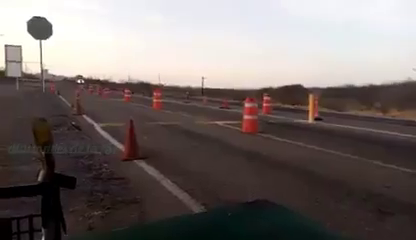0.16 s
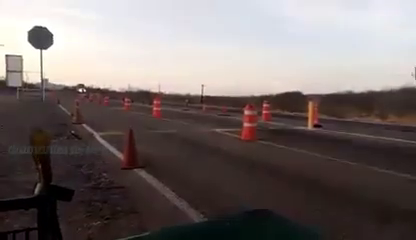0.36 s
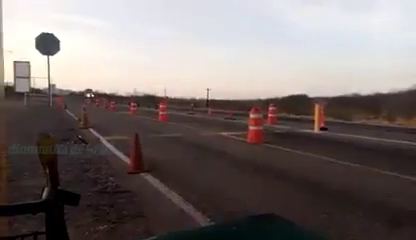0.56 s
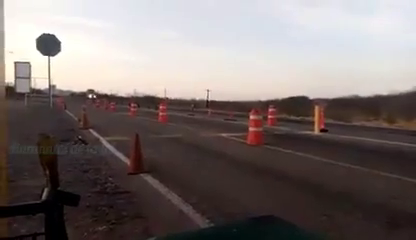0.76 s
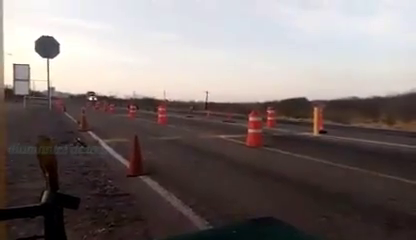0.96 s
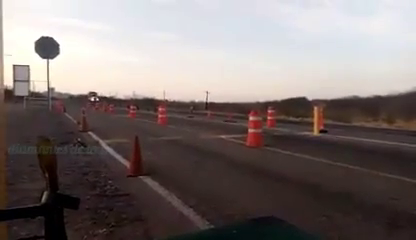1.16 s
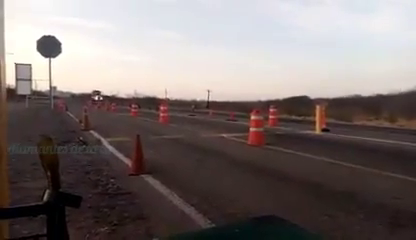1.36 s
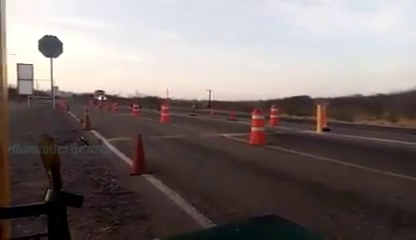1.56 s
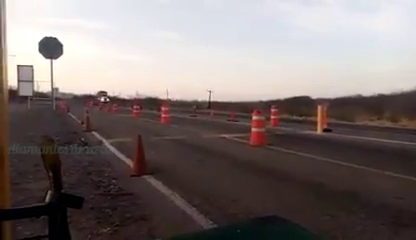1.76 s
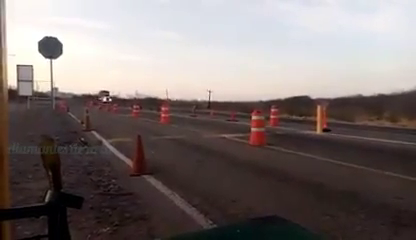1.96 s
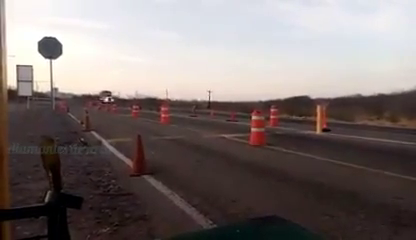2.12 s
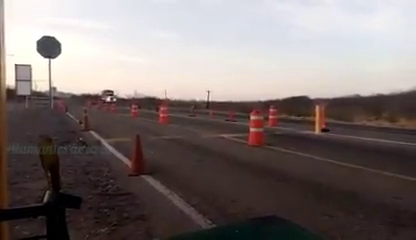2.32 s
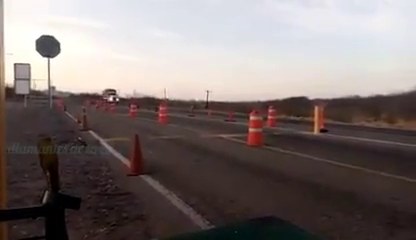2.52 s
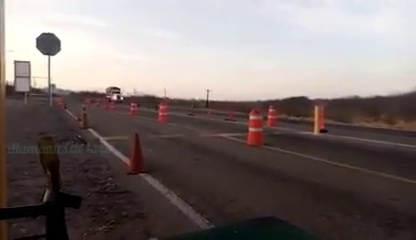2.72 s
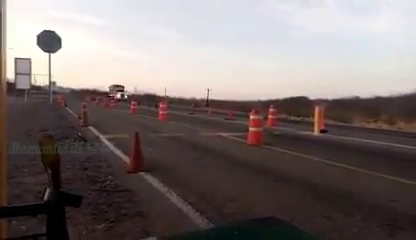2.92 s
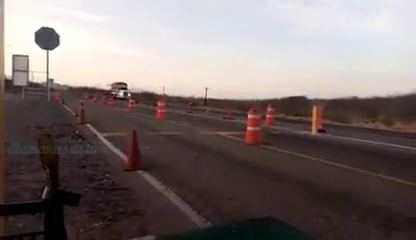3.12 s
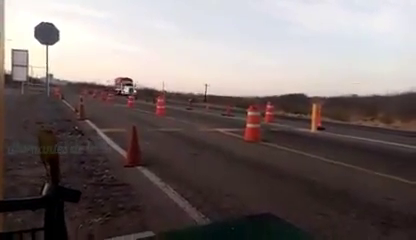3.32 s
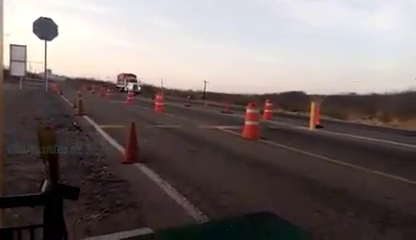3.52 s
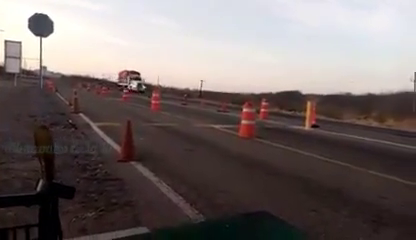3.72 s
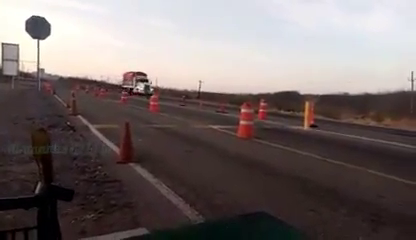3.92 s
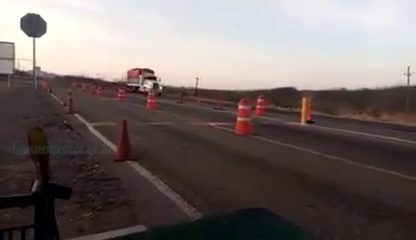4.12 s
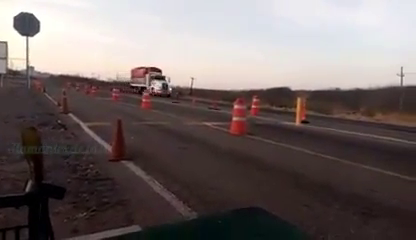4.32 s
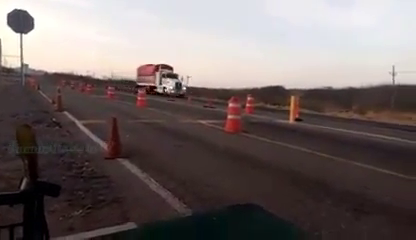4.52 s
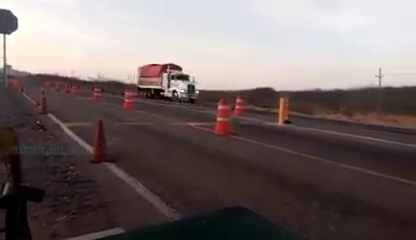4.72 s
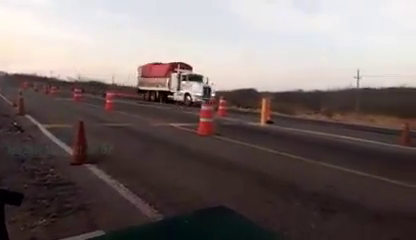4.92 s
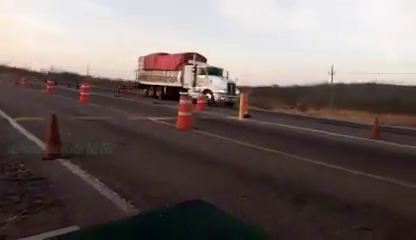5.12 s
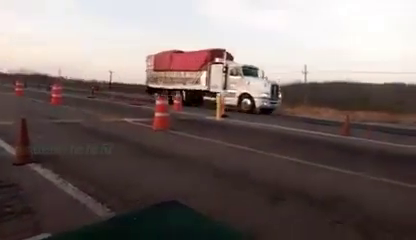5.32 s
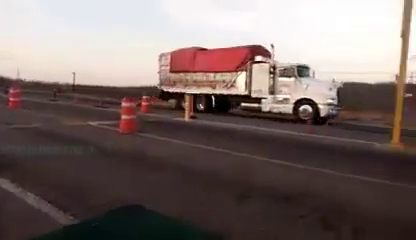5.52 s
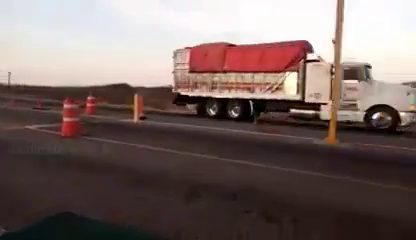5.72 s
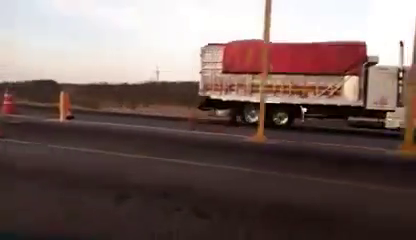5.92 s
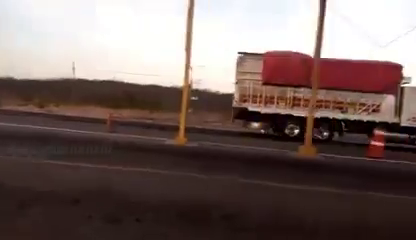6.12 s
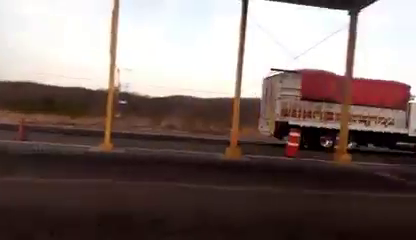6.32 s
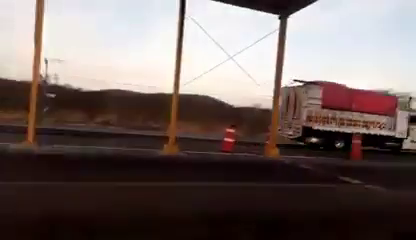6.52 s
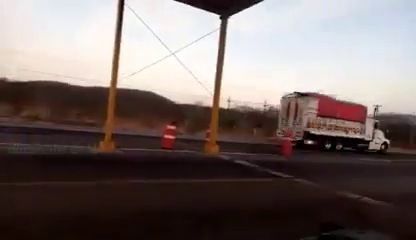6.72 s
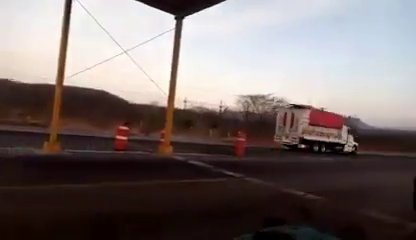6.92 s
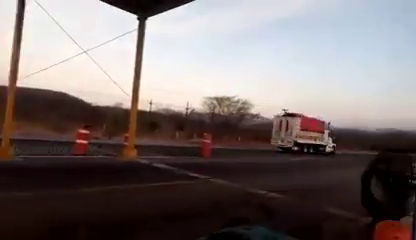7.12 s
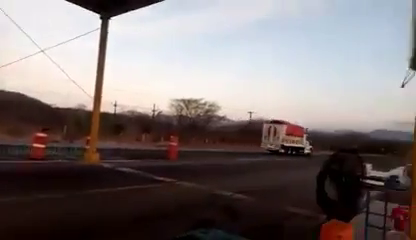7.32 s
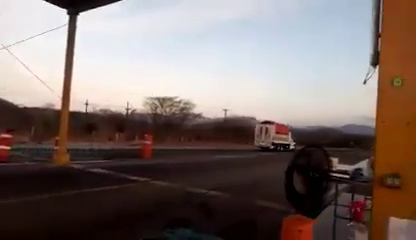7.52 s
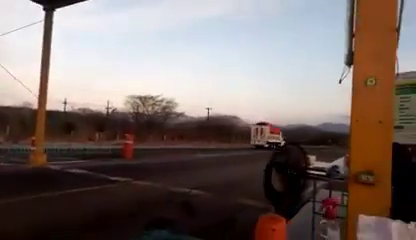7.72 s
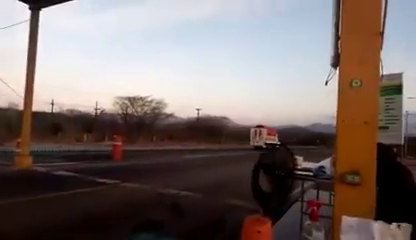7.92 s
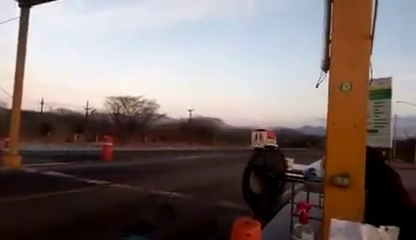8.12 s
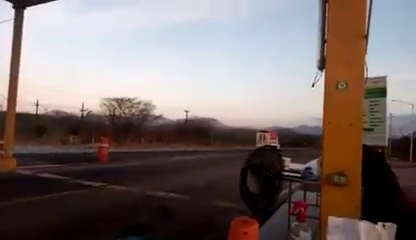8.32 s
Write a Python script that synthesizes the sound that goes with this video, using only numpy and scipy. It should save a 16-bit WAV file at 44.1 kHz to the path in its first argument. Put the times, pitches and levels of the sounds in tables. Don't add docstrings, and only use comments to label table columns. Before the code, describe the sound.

Out of brief silence, a distant diesel truck's engine brake sputters in a low, rapid throb. It cuts out for a gear change, leaving a soft rumble and faint falling turbo whistle, stutters back, then grows into a harsh hammering bark. It passes close with tyre roar and hiss, drops in pitch and recedes. A small phone microphone under a tin canopy catches short metallic echoes and strains at the peak.

```python
import sys
import numpy as np
from scipy import signal
from scipy.fft import rfft, irfft, next_fast_len
from scipy.io import wavfile
from scipy.ndimage import uniform_filter1d, minimum_filter1d

SR = 44100
rng = np.random.default_rng(int(sys.argv[2]) if len(sys.argv) > 2 else 0)


def to_wav(sig):
    pcm = np.clip(np.atleast_2d(sig), -1, 1) * 32767
    pcm = np.round(pcm).astype(np.int16)
    wavfile.write(sys.argv[1], SR, pcm.T)


def gain_from_db(level_db):
    decades = np.asarray(level_db, float) / 20
    return 10 ** decades


N = 373086
TIME = np.arange(N) / SR

SPEED_M_S, KERB_M, PASSES_S, SOUND_M_S = 27.6451, 15.4529, 6.0406, 343
SENT = np.linspace(-8, 4, 4801)
STACK_M, MIC_M, CLIMB_PER_M, CLIMB_M = 3.5, 1.45, .0045, 60
BRAKE_OFF_S, VALVE_S = (2.2, 3.58), 0.068

# (first [cycle], last [cycle], count at the pass [cycle], rate [cycle/s], gain of rate [cycle/s^2])
BRAKE_RUNS = [
    (2.3, 33.7, 94.2228, 14.76039, .059816),
    (56.3, 129, 94.2033, 14.6563, 0),
]
# (place in cycle [0-1], shock [dB], boom [dB], crackle [dB], rise [ms])
CYLINDERS_FAR = [(0, 5.5, 5.5, 2, 0.087), (.16, -5.5, -14, -39, 0.18), (.27, -19, -31, -15, 0.57),
                 (.509, 5, 3.5, -12, 0.28), (.70, -6, -25, -4, 0.36), (.94, -13, -29, -18, .6)]
# (place in cycle [0-1], shock [dB], boom [dB], crackle [dB], rise [ms])
CYLINDERS_FRONT = [(0, 4, -2.5, -2.5, 0.33), (.16, -37.5, -6, -16, 0.2), (.28, -30, -8.5, -36, 1),
                   (.508, 6.5, -1.5, -6.5, 0.42), (.70, -29, -22, -23.5, 0.42),
                   (.78, -13, -18.5, -40, 0.77)]
# (place in cycle
# [0-1], shock [dB], boom [dB], crackle [dB], rise [ms])
CYLINDERS_REAR = [(0, 12, 1, 1, 0.04), (.17, -10, -16, -7.5, 0.2), (.329, 8, 4, -4, 0.04),
                  (.51, 7, 1, -12.5, 0.4), (.662, 8.5, -10.5, -9.5, .04), (.85, -6.5, -18, -33, 0.3)]
# (place in cycle [0-1], shock [dB], boom [dB], crackle [dB], rise [ms])
CYLINDERS_SIDE = [(0, 8.5, 1.5, -0.5, 0.04), (.17, 1, -5, -8.5, 0.2), (.329, 8, -0.5, -3, 0.066),
                  (.51, -2.5, -7.5, -11, 0.2), (.662, 8.5, -2, -1, .04), (.85, -3.5, -5.5, -22.5, 0.2)]
# (frequency [Hz], t60 [s], level [dB])
PIPE_FAR = [(130, 0.12, -3), (178, 0.12, 1), (206.7, 0.077, -8.5), (315.7, 0.12, -14), (407, 0.07, -10.5),
            (635, 0.12, -10), (1043, 0.21, -29.5), (1595, 0.029, -24)]
# (frequency [Hz], t60 [s], level [dB])
PIPE_FRONT = [(132, 0.19, -9), (184, 0.073, -6.5), (213, 0.12, -9), (250, 0.17, -15.5), (319.7, 0.15, -7.5),
              (421, 0.058, -5.5), (533.4, 0.15, -0.5), (637.3, 0.1, -4.5), (1164, 0.08, -7.5)]
# (frequency [Hz], t60 [s], level [dB])
PIPE_REAR = [(113, 0.039, -27), (154, 0.072, 0), (208.3, 0.11, -5), (246.3, 0.072, -5.5), (448, 0.017, -1),
             (543.6, 0.031, -3.5), (588, 0.11, -13)]
# (frequency [Hz], t60 [s], level [dB])
PIPE_ABREAST = [(164.4, 0.13, 2.5), (226, 0.15, 4), (310, 0.071, -11), (389, 0.17, -0.5), (437, 0.058, -4),
                (580, .07, -1.5), (693, 0.091, 0), (820, 0.061, 9)]
# (frequency [Hz], t60 [s], level [dB])
BARKING_TIP = [(897, 0.0077, -9.5), (1380, 0.0071, -8)]
# (delay [ms], shock [dB], crackle [dB])
STACK_REPEATS = [
    (0, 0, 0),
    (6.5, -13, -5),
    (9.6, -8, -11),
]
# (time [s], distant [0-1], oncoming [0-1], leaving [0-1], abreast [0-1])
STACK_FACING = [
    (3, 1, 0, 0, 0),
    (3.1, 0, 1, 0, 0),
    (5.72, 0, 1, 0, 0),
    (5.92, 0, 0, 0, 1),
    (6.3, 0, 0, 0, 1),
    (6.6, 0, 0, 1, 0),
]
# (at distance [m], blast [dB], crackle [dB], boom [dB], bark [dB])
SIDE_LEVELS = [
    (125.7, -26, -14.5, 4, -4.1),
    (37.1, -15.5, -10, 1.5, 3),
    (36, -21.5, -0.5, 5, -10.5),
    (17.3, -18, -1.5, 0.7, -13.5),
]
# (blast [dB], crackle [dB], boom [dB], bark [dB])
SIDE_SLOPES = [
    (-5.5, -18, -3.2, 4.5),
    (-5, -0.5, 3, -1),
    (-3, -0.3, 1.5, 1.5),
    (-4.5, -1, 3.1, 1),
]
SIDE_REPEATS_DB = [1, -0.5, -5, -4]
SIDE_SHOCK_MS = [.38, .3, .11, .15]
SIDE_PITCH = [-1, -1, 1, 0]
# (time [s], peak [dB])
UNEVEN_BLASTS = [(4.988, -3), (5.052, -1), (5.115, -2), (5.147, -3), (5.178, -3), (5.211, -3), (5.242, -3),
                 (5.274, -2), (5.306, -2), (5.37, 0), (5.402, -4), (5.434, 0), (5.466, -4), (5.498, -3),
                 (5.53, 0), (5.562, -3), (5.596, -2), (5.627, -1), (5.693, 3), (5.725, -3), (5.758, -1),
                 (5.824, 0), (5.891, 0), (5.912, -1), (5.934, 0), (5.958, -1), (6.025, 1), (6.094, 0),
                 (6.162, 0), (6.232, 1), (6.303, 1), (6.373, 0), (6.445, 0), (6.492, 1), (6.517, 1),
                 (6.588, 1), (6.661, 1), (6.733, 2), (6.805, 0), (6.853, -1), (6.95, -2), (7.023, 0),
                 (7.169, 0), (7.242, -1), (7.315, -2)]
# (time [s], peak [dB], rise [ms])
VALVE_STUTTER = [(2.4717, -28, 0.23), (2.479, -13.5, 0.073), (2.502, -9.5, 0.47), (2.5122, -16.5, 0.087),
                 (2.5341, -11, 0.076), (2.725, -16.5, 0.17), (2.7312, -16, 0.076), (2.753, -10, 0.22),
                 (2.764, -14.5, 0.71), (2.7867, -8, 0.052), (3.5495, -10.5, 0.11), (3.569, -9.5, 0.65),
                 (3.583, -6.5, 0.17), (3.6054, -4, 0.1), (3.642, -26, 0.14), (3.675, -9, 0.15)]
# (nearest [dB], oncoming [dB/doubling], leaving [dB/doubling], brake released [dB])
ROLLING_LEVELS = [
    (-16.5, -5, -9, -0.5),
    (-20, -7, -3.5, -8.5),
]
# (frequency [Hz], density [dB])
ROAR_COLOUR = [(15, -59), (25, -38.5), (59, 0), (91, 0), (147, -7), (189, 2), (262, -6.5), (283, -12),
               (850, -13.5), (2500, -34), (3250, -57), (5500, -120)]
# (frequency [Hz], density [dB])
HISS_COLOUR = [(500, -38), (1200, 9.5), (2500, 6.5), (4200, 2), (6400, -11), (8000, -12.5), (12000, -26.5)]
# (time [s], pitch [Hz], level [dB])
TURBO_GLIDE = [
    (2.85, 9900, -80),
    (2.92, 9550, -50),
    (3.2, 8800, -50),
    (3.45, 8300, -52),
    (3.56, 8200, -80),
]
# (time [s], pipe bass [dB], canopy echo [dB])
SHELTER_LEVELS = [(0, 1.7, -5.5), (2.2, -0.4, -1), (3.6, 1, 0), (4.4, -0.4, 0), (5.0, 0.8, -0.5),
                  (5.4, -1.5, -7), (5.6, -5.5, -8), (5.85, -10, -5.5), (6.05, -1.5, -0.7), (6.35, 3.5, 3.8),
                  (6.8, -1, -1.5), (7.3, -0.8, -3.5), (7.9, 0, -2), (8.46, -0.8, -2)]
# (frequency [Hz], level [dB])
TIN_COLOUR = [(150, -7), (400, 2), (1000, -2)]
# (frequency [Hz], level [dB])
MIC_COLOUR = [(20, -20), (60, -17), (120, -3.5), (300, 0), (2500, -5), (4500, -6.5), (6500, -0.5),
              (8000, -15), (9300, -20.5), (10500, -23.5), (16000, -26.5)]

BLOCK, BLOCK_START = 1024, 170


def curves(table, at=TIME):
    s, *columns = np.transpose(table)
    return [np.interp(at, s, c) for c in columns]


def colour(x, spectrum):
    hz, db = np.transpose(spectrum)
    size = next_fast_len(len(x))
    bins_hz = np.fft.rfftfreq(size, 1 / SR)
    gain = gain_from_db(np.interp(np.log(bins_hz + 1), np.log(hz), db))
    return irfft(rfft(x, size) * gain, size)[:len(x)]


def noise(spectrum, flicker_db, flicker_hz):
    k = int(SR / flicker_hz)
    walk = uniform_filter1d(np.repeat(rng.standard_normal(N // k + 1), k), k)[:N]
    x = colour(rng.standard_normal(N), spectrum) * gain_from_db(flicker_db * walk)
    return x / x.std()


def strike(times, gains, shape, pitch=None):
    out, steps = np.zeros(N + len(shape)), np.arange(len(shape))
    for k, (start, gain) in enumerate(zip((times * SR).astype(int), gains)):
        if 0 <= start < N and gain > 1e-7:
            copy = shape if pitch is None else np.interp(steps * pitch[k], steps, shape)
            out[start:start + len(shape)] += gain * copy
    return out[:N]


def heard(sent):
    return PASSES_S + sent + (np.hypot(SPEED_M_S * sent, KERB_M) - KERB_M) / SOUND_M_S


def truck(at=TIME):
    along = SPEED_M_S * np.interp(at, heard(SENT), SENT)
    return along, np.hypot(along, KERB_M)


def doppler(times, side):
    along, metres = truck(times)
    return (SOUND_M_S + side * SPEED_M_S) / (SOUND_M_S + SPEED_M_S * along / metres)


def released():
    off, on = BRAKE_OFF_S
    return np.clip(np.minimum(TIME - off, on - TIME) / VALVE_S + .5, 0, 1)


def arrivals(turns):
    times = np.full(len(turns), 99.)
    for first, last, at_pass, rate, gain in BRAKE_RUNS:
        sent = np.interp(turns, at_pass + rate * SENT + gain * SENT ** 2 / 2, SENT)
        times = np.where((turns > first) & (turns < last), heard(sent), times)
    return times


def accent_db(times):
    s, db = np.transpose(UNEVEN_BLASTS)
    usual_db, share = -1.5, 1.1
    return (np.abs(times[:, None] - s) < .004) @ (share * (db - usual_db))


def ring(modes):
    t = TIME[:SR // 6]
    return sum(gain_from_db(db) * np.cos(2 * np.pi * hz * t) * np.exp(-np.log(1000) * t / t60)
               for hz, t60, db in modes)


def blasts(times, shock_db, boom_db, crackle_db, bark_db, rise_ms, modes,
           again_db=0, lead_s=0, shock_ms=0.29, side=-1):
    t = TIME[:SR // 50] * 1000
    front = np.exp(-t / rise_ms)
    front /= front.sum()
    push = 1.4 * np.exp(-t / shock_ms)
    suction = 1.4 * shock_ms * np.exp(-t / 1.2)
    shock = np.convolve(push - suction, front)
    bark = np.convolve(ring(BARKING_TIP)[:len(t)], front)
    gas = (1 - np.exp(-(t / 1.0) ** 2)) * (1.61 * np.exp(-t / 1.5) + 0.12 * np.exp(-t / 7))
    boom = ring(modes)
    boom = boom * (1 - np.exp(-TIME[:len(boom)] / 0.00059))
    out = strike(times - lead_s, gain_from_db(boom_db - 11.5), boom, doppler(times, side))
    gate = 0
    for ms, echo_db, hiss_db in STACK_REPEATS:
        echo_db, hiss_db = np.array([echo_db, hiss_db]) + again_db * (ms > 0)
        late = times + ms / 1000
        out += strike(late, gain_from_db(shock_db + echo_db), shock)
        out += strike(late, gain_from_db(shock_db + hiss_db + bark_db), bark)
        gate += strike(late, gain_from_db(crackle_db + hiss_db), gas)
    return out, gate


def braking_cylinder(cylinder, modes, stage):
    place, shock_db, boom_db, crackle_db, rise_ms = cylinder
    cycles = np.arange(130.)
    chance = rng.standard_normal((len(cycles), 4)).T
    times = arrivals(cycles + place)
    even = round(place * 6) / 6
    lead_s = (times - arrivals(cycles + even)) * (abs(place - even) < .02 and stage < 2)
    metres = truck(times)[1]
    near = KERB_M / metres
    scatter_db = .1 + 1.0 * near
    jitter_ms = .02 + .15 * near ** 3
    times = times + jitter_ms * chance[0] / 1000 * min(place * 20, 1)
    facing_db = 20 * np.log10(curves(STACK_FACING, times)[stage] + 1e-9)
    at_m, *levels_db = SIDE_LEVELS[stage]
    change_db = np.outer(SIDE_SLOPES[stage], np.log2(metres / at_m))
    blast_db, hiss_db, low_db, bark_db = np.array(levels_db)[:, None] + change_db
    db = blast_db + facing_db + 17.0 + scatter_db * chance[1] + accent_db(times)
    return blasts(times, db + shock_db,
                  db - 3.5 + boom_db + low_db + scatter_db * chance[3],
                  db + crackle_db + hiss_db + 5 + scatter_db * chance[2],
                  bark_db, max(rise_ms, .02), modes, SIDE_REPEATS_DB[stage], lead_s,
                  SIDE_SHOCK_MS[stage], SIDE_PITCH[stage])


def engine_brake():
    out, gate = 0, 0
    sides = ((CYLINDERS_FAR, PIPE_FAR), (CYLINDERS_FRONT, PIPE_FRONT),
             (CYLINDERS_REAR, PIPE_REAR), (CYLINDERS_SIDE, PIPE_ABREAST))
    for stage, (cylinders, modes) in enumerate(sides):
        for cylinder in cylinders:
            sound, puff = braking_cylinder(cylinder, modes, stage)
            out, gate = out + sound, gate + puff
    sound, puff = valve_stutter()
    torn_gas = noise([(300, 0.0), (1200, 9.0), (3200, 3.0), (4300, 0.5), (16000, -3.5)], 2.26, 2000)
    return out + sound + (gate + puff) * torn_gas


def rolling():
    along, metres = truck()
    doublings = np.log2(metres / KERB_M)
    roar_db, hiss_db = (db + np.where(along < 0, coming, going) * doublings + off_db * released()
                        for db, coming, going, off_db in ROLLING_LEVELS)
    return gain_from_db(roar_db) * noise(ROAR_COLOUR, 2.2, 25) + gain_from_db(hiss_db) * noise(HISS_COLOUR, 1.0, 40)


def road_bounce(x):
    along, metres = truck()
    stack = STACK_M * (1 + CLIMB_PER_M * np.clip(along, -CLIMB_M, CLIMB_M))
    late = (np.hypot(metres, stack + MIC_M) - np.hypot(metres, stack - MIC_M)) / SOUND_M_S
    dull = colour(x, [(1500, -1.5), (3500, -3.5), (7000, -11.5)])
    return x + np.exp(-metres / 230) * np.interp(TIME - late, TIME, dull)


def canopy(x):
    place = 21 * (np.arctan(truck()[0] / KERB_M) / np.pi + .5)
    t = TIME[:SR // 3]
    tail = np.exp(-np.log(1000) * t / 0.39) * np.minimum(t / 0.0025, 1)
    out = 0
    for k in range(23):
        echoes = rng.standard_normal(len(t)) * tail
        share = np.cos(np.clip(place - k, -1, 1) * np.pi / 2)
        out += signal.fftconvolve(x * share * gain_from_db(-1), echoes / np.linalg.norm(echoes))[:N]
    return colour(out, TIN_COLOUR)


def rumble():
    throb = noise([(40, -36.0), (70, -16.5), (95, 0.0), (125, -0.5), (250, -36.5)], 0.82, 27)
    return gain_from_db(-31) * released() * throb


def valve_stutter():
    out, gate = 0, 0
    crackle_db, bark_db = -14, -6
    one = np.ones(1)
    for time, db, rise_ms in VALVE_STUTTER:
        sound, puff = blasts(time * one, (db + 7.5) * one, (db + 0.5) * one,
                             (db + crackle_db + 3.5) * one, bark_db, max(rise_ms, .02), PIPE_FAR)
        out, gate = out + sound, gate + puff
    return out, gate


def turbo_whistle():
    hz, db = curves(TURBO_GLIDE)
    waver = 1 + .01 * noise([(1, -7.5), (40, -3), (200, -49)], 0, 5)
    return gain_from_db(db) * np.sin(2 * np.pi * np.cumsum(hz * waver) / SR)


def hand(x):
    late_s, share = 0.372 / 1000, 0.16
    turned = sum(curves(STACK_FACING)[2:])
    return x + share * turned * np.interp(TIME - late_s, TIME, x)


def post(x):
    notched = colour(x, [(750, 1), (1080, -6.5), (1400, 0.5)])
    return x + np.interp(TIME, (6.43, 8.36), (0, 1)) * (notched - x)


def scene():
    bass_db, echo_db = curves(SHELTER_LEVELS)
    brake = engine_brake()
    bass = colour(brake, [(270 * 0.93, 0), (270 * 2.1, -30)])
    brake = brake + (gain_from_db(bass_db) - 1) * bass
    echoes = gain_from_db(echo_db) * canopy(brake)
    truck_noise = 1.4 * (rolling() + turbo_whistle()) + rumble()
    return post(road_bounce(brake) + echoes + truck_noise)[None]


def limit(x, top):
    block = (np.arange(N) + BLOCK - BLOCK_START) // BLOCK
    peak = np.zeros(block[-1] + 1)
    np.maximum.at(peak, block, np.abs(x))
    gain = np.minimum(1, top / (peak + 1e-9))[block]
    smooth = uniform_filter1d(minimum_filter1d(gain, size=121), size=121)
    return np.clip(x * smooth, -1, 1)


def treble_gate(x):
    edge_hz, edge_bins = 7900, 16
    kept_db, kept_db_per_khz, whim_db = -47, 3.2, 3.0
    hz, _, frames = signal.stft(x, SR, nperseg=2 * BLOCK)
    power = np.abs(frames[1:]) ** 2
    bands = power.reshape(-1, edge_bins, power.shape[1]).sum(axis=1)
    kept_db = kept_db + kept_db_per_khz * np.clip(hz[1::edge_bins, None] - edge_hz, 0, 4000) / 1000
    threshold = gain_from_db(kept_db + whim_db * rng.standard_normal(bands.shape)) ** 2
    over = bands / (power.sum(axis=0) * threshold + 1e-18)
    frames[1:] *= np.repeat(1 / (1 + over ** 6), edge_bins, axis=0)
    weak = signal.istft(frames * (hz > edge_hz)[:, None], SR)[1][:N]
    treble = signal.sosfiltfilt(signal.butter(12, 9300, "high", fs=SR, output="sos"), x)
    power = uniform_filter1d(treble ** 2, size=200)
    floor = gain_from_db(-53) ** 2 + 3.3 * uniform_filter1d(power, size=6000)
    return x - weak / (1 + (power / floor) ** 8)


def band_limit(x):
    return signal.sosfilt(signal.butter(12, 15970, fs=SR, output="sos"), x)


def record(dry):
    start_s, fade_s = 0.19, 0.31
    fade = np.clip((TIME - start_s) / fade_s, 0, 1) ** 0.93
    x = colour(hand(dry[0]), MIC_COLOUR) * fade
    mix = treble_gate(limit(x, top=1.0))[None]
    return band_limit(mix)


dry = scene()
out = record(dry)
to_wav(out)
```